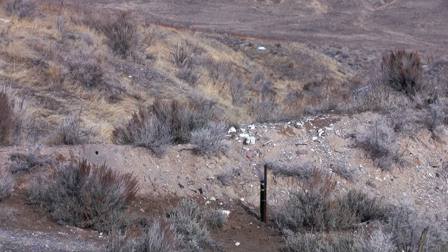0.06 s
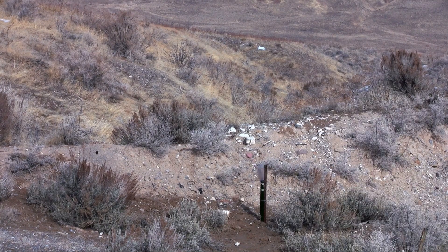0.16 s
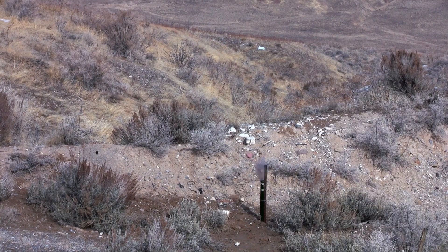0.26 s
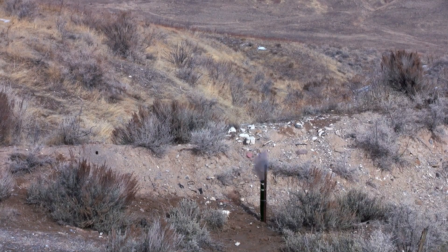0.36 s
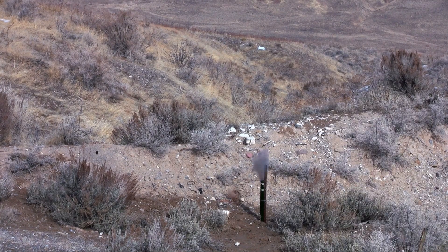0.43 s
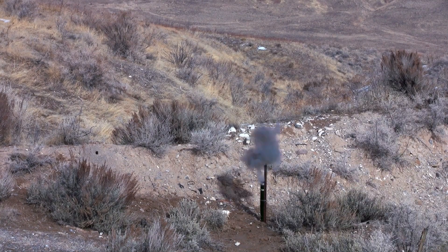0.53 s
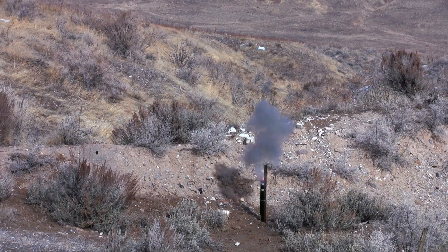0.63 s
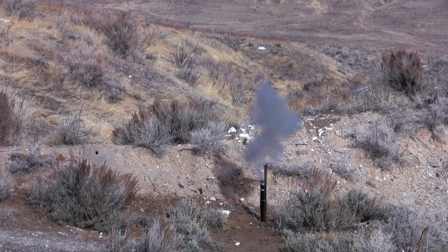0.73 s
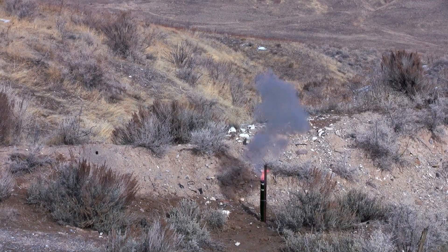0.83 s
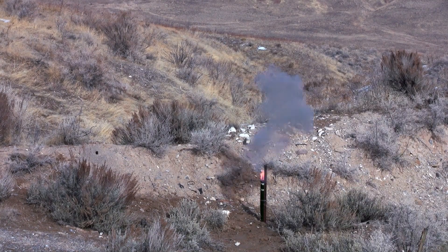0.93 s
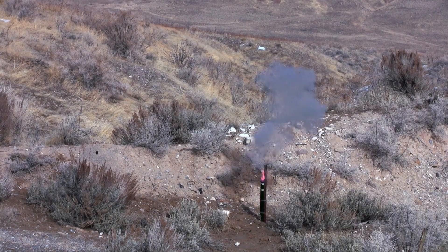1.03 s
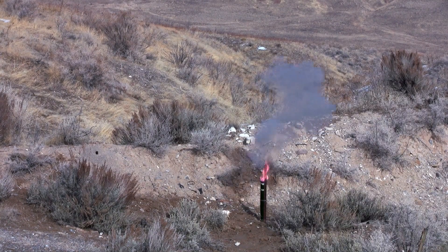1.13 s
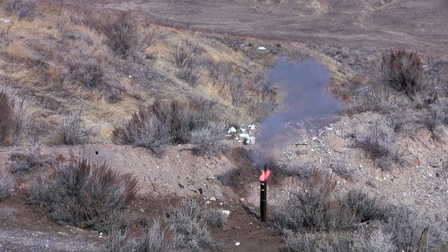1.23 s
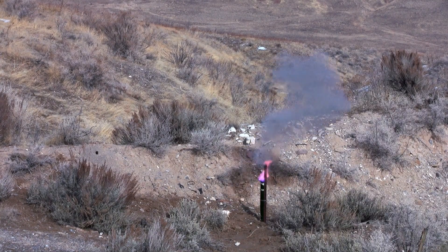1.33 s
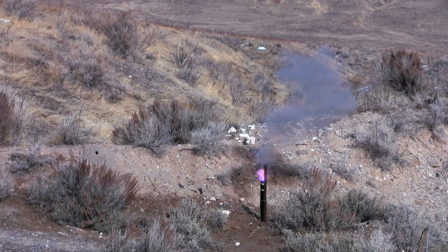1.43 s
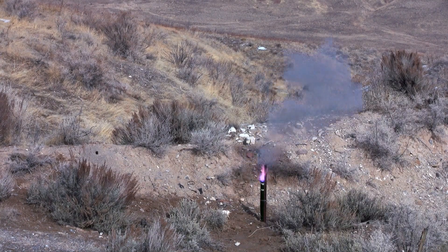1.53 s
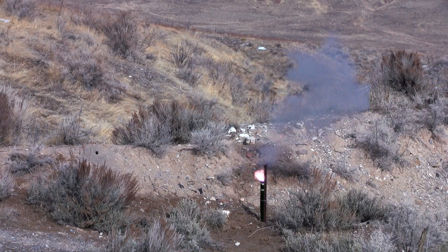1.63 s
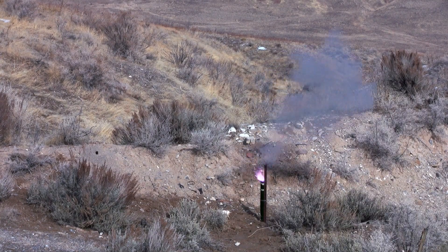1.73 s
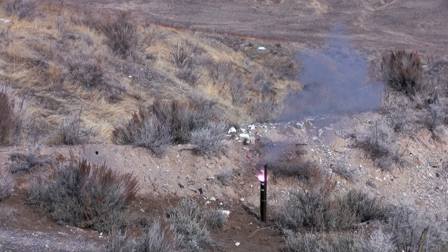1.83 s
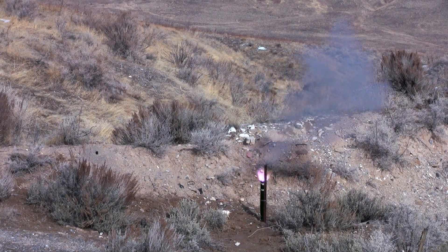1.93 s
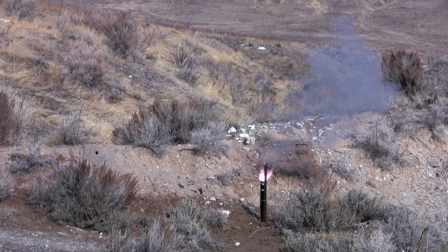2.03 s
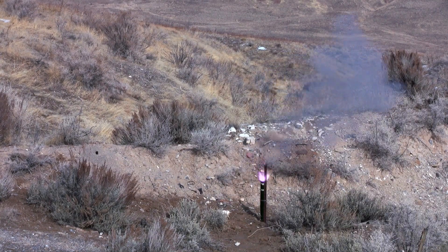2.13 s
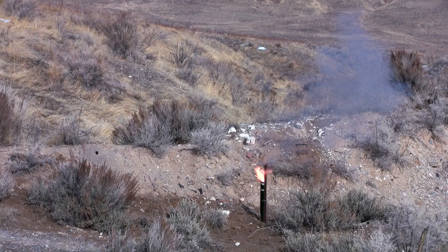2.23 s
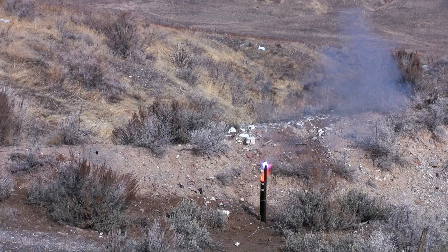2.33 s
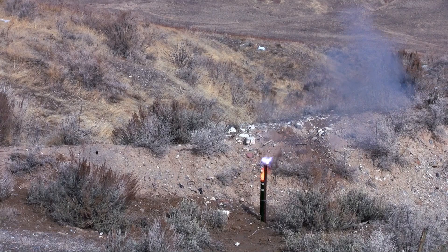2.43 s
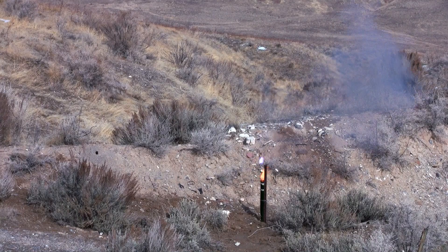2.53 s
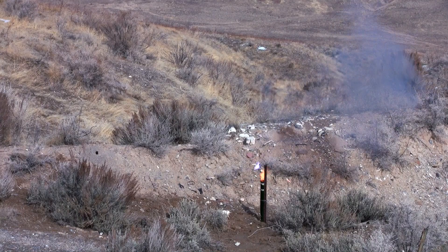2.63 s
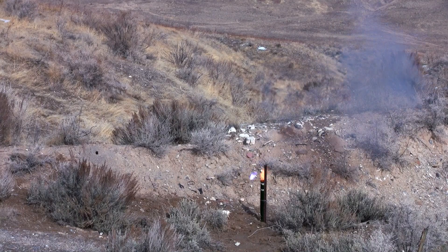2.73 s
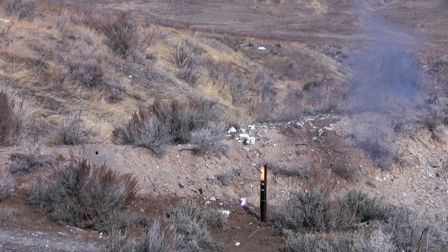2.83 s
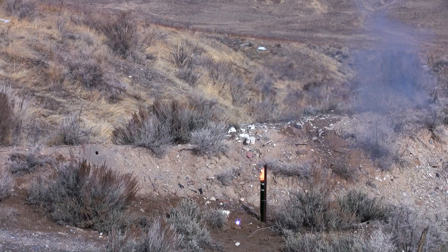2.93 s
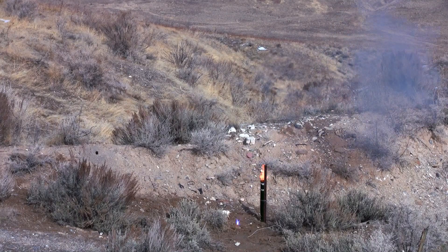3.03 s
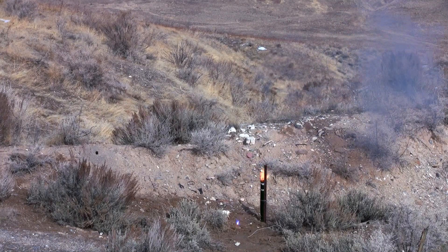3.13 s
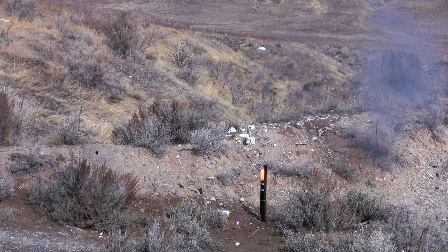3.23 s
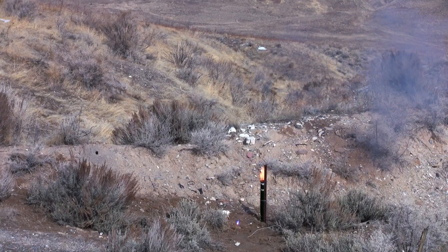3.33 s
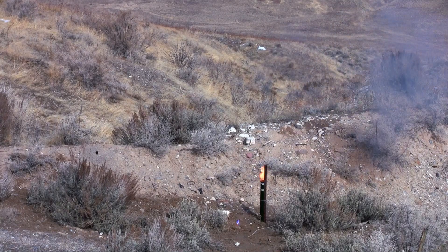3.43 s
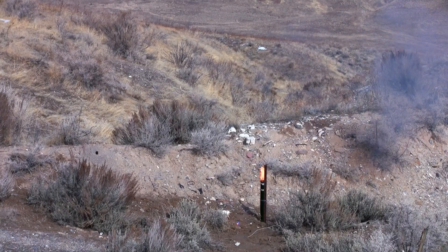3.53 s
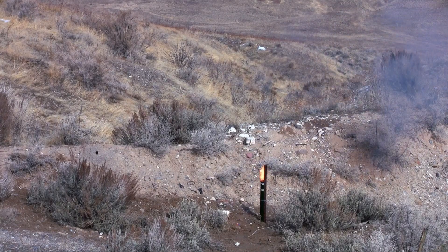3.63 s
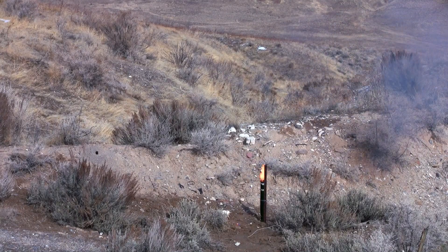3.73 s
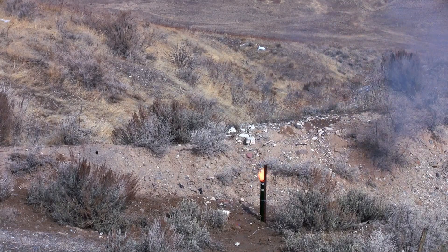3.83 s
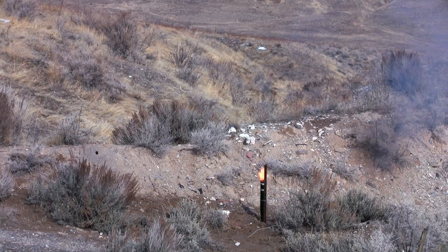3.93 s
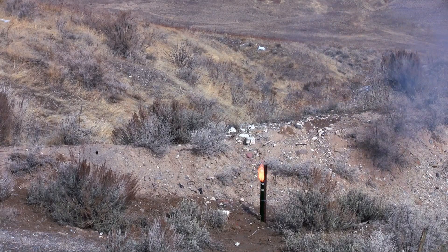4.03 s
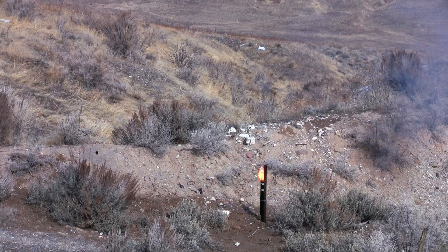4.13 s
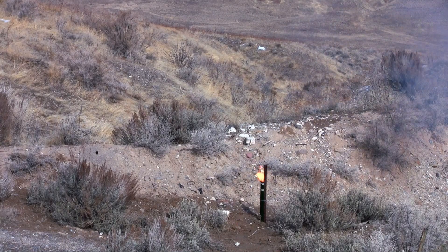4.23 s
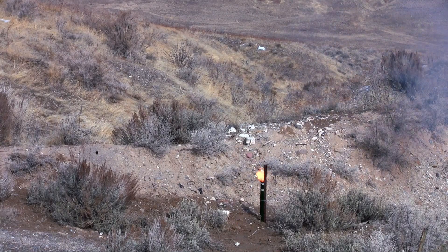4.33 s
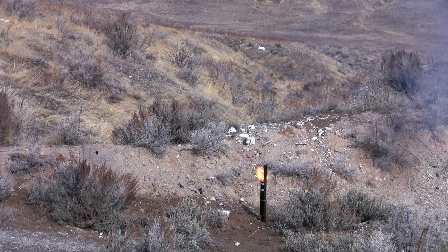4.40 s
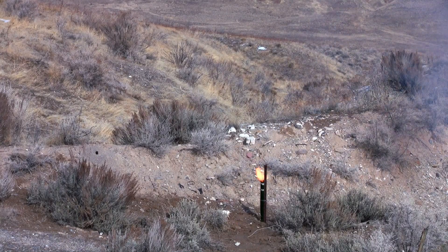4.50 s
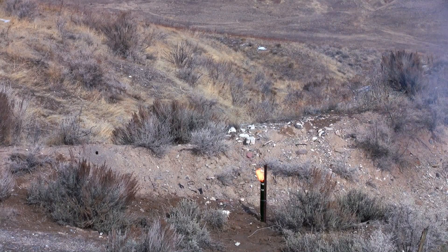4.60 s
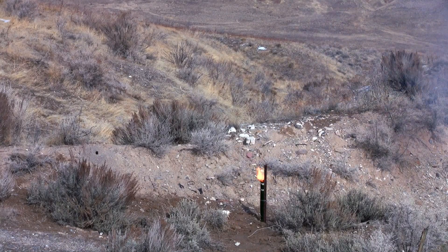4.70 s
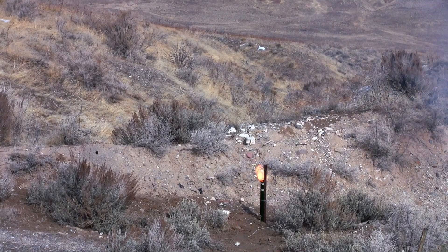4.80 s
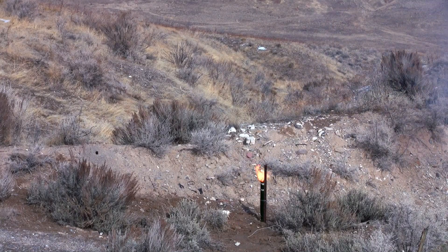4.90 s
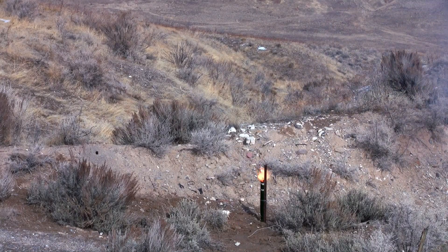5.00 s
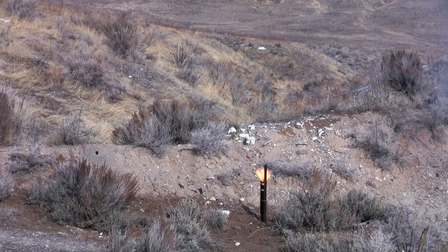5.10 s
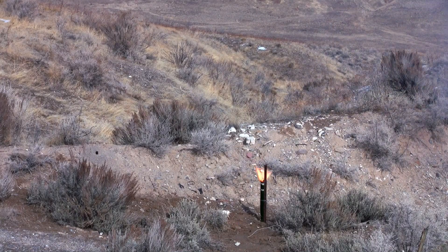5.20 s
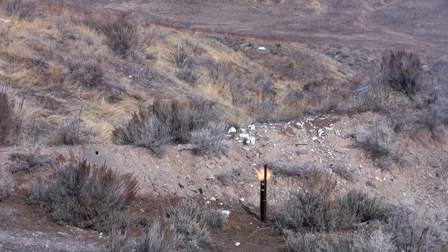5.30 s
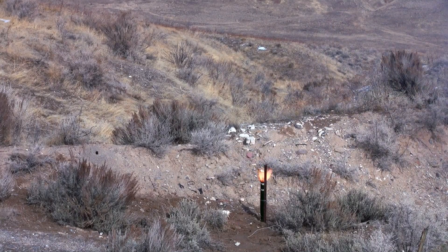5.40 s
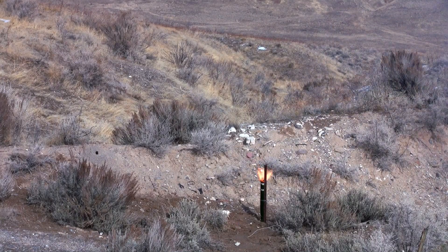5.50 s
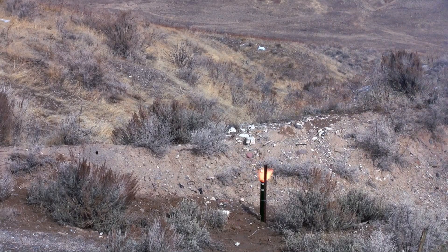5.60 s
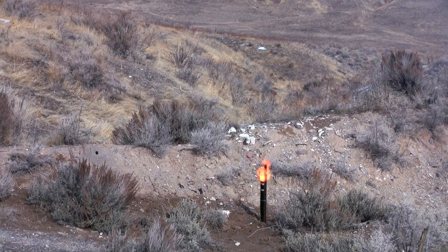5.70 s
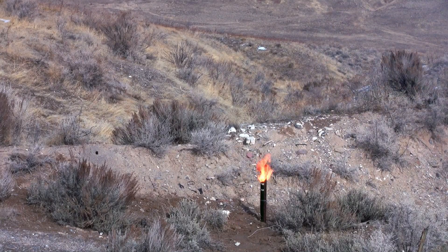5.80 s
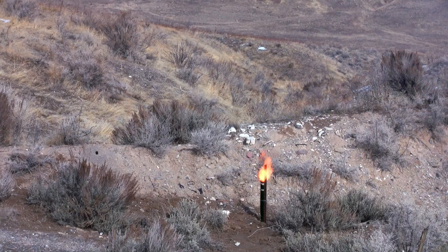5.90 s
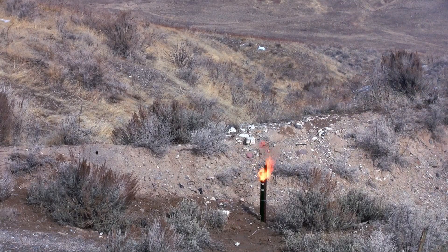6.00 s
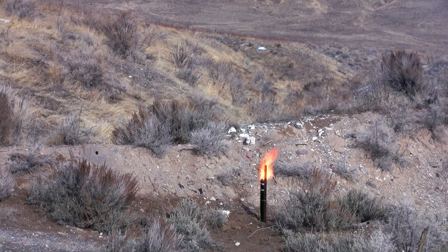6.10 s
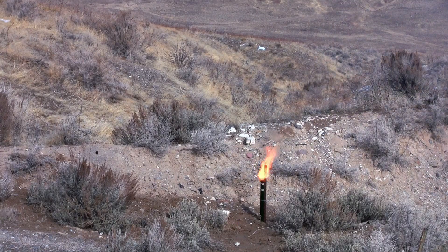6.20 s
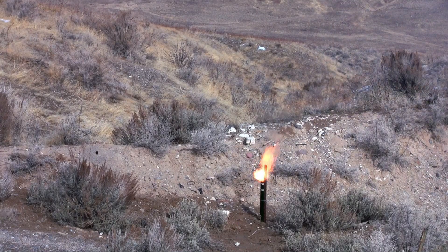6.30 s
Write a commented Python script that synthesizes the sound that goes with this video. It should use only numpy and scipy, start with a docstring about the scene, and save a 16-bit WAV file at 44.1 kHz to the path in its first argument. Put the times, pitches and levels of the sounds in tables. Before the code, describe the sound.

Rising gas hiss snaps into a loud crack echoing off a hillside, followed by ragged flame bursts, faint sputter, and a long growing roar turning to hiss.

```python
"""A homemade rocket motor chuffs on a stand on a hillside, straight ahead of two microphones.
Noise shaped as gas hisses from the nozzle in swelling surges, roars as open flame, and twice breaks off
with a crack made of millisecond spurts. Low noise rumbles in the plume; the motor also smoulders, spits and thuds.
The ground combs the hiss, brush nearby, a bank behind and a far slope throw the sound back as decaying
scatter, and at first puffs of breeze brush the microphones over quiet open-country air."""
import sys
import numpy as np
from scipy import signal
from scipy.fft import rfft, irfft, next_fast_len
from scipy.io import wavfile
from scipy.ndimage import uniform_filter1d

SR = 44100
rng = np.random.default_rng(int(sys.argv[2]) if len(sys.argv) > 2 else 0)


def wrap_up_sound(samples):
    """Save the sound to the file named by the first command line argument, as 16-bit audio."""
    columns = np.atleast_2d(samples).T
    # keep every value between -1 and 1, then stretch to whole-number steps
    tamed = np.clip(columns, -1, 1)
    steps = np.round(tamed * 32767).astype(np.int16)
    wavfile.write(sys.argv[1], SR, steps)


N = 280146
TIME = np.arange(N) / SR


def gain_of(db):
    """Decibels to amplitude."""
    return 10 ** (np.asarray(db) / 20)


def evened(x):
    """Scales to rms 1."""
    return x / np.sqrt(np.mean(x ** 2) + 1e-20)


def read(points, hz):
    """Reads a spectrum on a log-frequency axis."""
    f, value = np.transpose(points)
    return np.interp(np.log(hz + 1), np.log(f + 1), value)


def coloured(x, spectrum):
    """Filters a signal by a spectrum."""
    size = next_fast_len(len(x) + 2048)
    gain = gain_of(read(spectrum, np.fft.rfftfreq(size, 1 / SR)))
    return irfft(rfft(x, size) * gain, size)[:len(x)]


def wander(t, top_hz):
    """Slow random drift of rms 1 with movements up to about top_hz."""
    knots = rng.standard_normal(4000)
    # 1.22 restores the rms that straight lines between the knots lose
    return 1.22 * np.interp(t * 2 * top_hz, np.arange(len(knots)), knots)


def gate(t, start, end, fade):
    """Opens around start and shuts around end, keeping the power even where two spells meet."""
    return np.sqrt(np.clip(np.minimum(t - start, end - t) / fade + .5, 0, 1))


# Colour of the open air: (frequency [Hz], relative level [dB per Hz])
AIR_COLOUR = [(15, -50.5), (25, -20.5), (59, -5), (227, -5.5), (349, -1), (445, -6), (523, -4),
              (997, -10.5), (1620, -10.5), (3720, -22), (5140, -30), (8130, -35), (15500, -44)]
# What differs between the microphones in the air, side minus mid: (frequency [Hz], level [dB])
AIR_SPREAD = [(40, -7), (200, -5), (700, 1), (3000, -7.5), (8000, 0.5), (14000, -1.5)]


def air():
    """Quiet open country: steady noise, partly different at each microphone."""
    both, apart = (evened(coloured(rng.standard_normal(N), AIR_COLOUR)) for _ in range(2))
    apart = coloured(apart, AIR_SPREAD)
    level_db = -61
    return gain_of(level_db) * (both + np.array([apart, -apart]))


def billow_power(s, db, length):
    """A billow of gas or air swells quickly and rolls away over its own length."""
    power, rise_s = np.zeros(N), .012
    near = slice(*np.searchsorted(TIME, [s - .1, s + 4 * length]))
    age = TIME[near] - s
    power[near] = gain_of(db) ** 2 * np.exp(-(age / np.where(age < 0, rise_s, length)) ** 2)
    return power


# Colour of wind on the microphones: (frequency [Hz], relative level [dB per Hz])
WIND_COLOUR = [(25, -29), (45, -9), (70, 0.5), (140, 4), (300, -2.5), (500, -8), (800, -15), (1600, -34.5),
               (6000, -79.5)]
# Puffs of wind that buffet the microphones: (time [s], peak level [dB], length [s])
WIND_PUFFS = [(.03, -49.5, .2), (.24, -48, .08), (.37, -49, .07), (.455, -38.5, .045), (.57, -54, .04),
              (.79, -51.5, 0.11), (1.03, -59, .03)]


def wind():
    """Puffs of breeze buffet each microphone with its own low noise, swelling together."""
    ports = np.array([evened(coloured(rng.standard_normal(N), WIND_COLOUR)) for _ in range(2)])
    return np.sqrt(sum(billow_power(*puff) for puff in WIND_PUFFS)) * ports


CRACK_BOUNCE_MS, CRACK_BOUNCE = .545, .36  # delay [ms] and share of the ground bounce


def ground(hz, delay_ms, share):
    """Gain of the direct sound plus its bounce off the ground, a comb in frequency."""
    return abs(1 + share * np.exp(-2j * np.pi * hz * delay_ms / 1e3)) / np.sqrt(1 + share ** 2)


# Brush nearby, bank behind and far slope, before colouring:
# (delay [s], energy per second [dB], rise [dB/s], fall [dB/s])
ECHOES = [(.008, -8.5, 299.5, 384.5), (.1, -25.5, 100.5, 99.5), (.35, -21.5, 302, 280)]


def hillside(x, absorb_db, from_s):
    """Scatter arriving after from_s; air takes absorb_db per kHz and second of travel."""
    t = np.arange(SR * 6 // 10) / SR
    power = sum(gain_of(db - np.maximum(rise * (s - t), fall * (t - s))) ** 2
                for s, db, rise, fall in ECHOES)
    taps = rng.standard_normal(len(t)) * np.sqrt(power / SR) * (t >= from_s)
    hz, delay, z = signal.stft(taps, SR, nperseg=256)
    # sound that leaves sideways to the slope lacks the ground comb
    z = z / ground(hz[:, None], CRACK_BOUNCE_MS, CRACK_BOUNCE)
    absorbed = gain_of(-absorb_db * delay * hz[:, None] / 1e3)
    tail = signal.istft(z * absorbed, SR, nperseg=256)[1]
    tail = coloured(tail, [(150, -1.0), (1000, -5.5), (2500, 4.0), (8000, 9), (14000, 6.5)])
    return signal.fftconvolve(x, tail)[:N]


# How the two microphones differ, side minus mid: (frequency [Hz], level [dB])
PORT_PHASE = [(1000, -40.5), (3000, -62.5), (6000, -43.5), (7500, -24.5), (9000, -12.5), (14000, -16)]  # quarter-cycle phase shift
LEAN_RIGHT = [(5000, -56.5), (8500, -19), (12000, -46.5)]  # level lean
DIFFUSE = [(30, -22), (80, -28), (160, -30.5), (600, -22.5), (1300, -37), (3000, -55), (14000, -24)]  # scatter


def microphones(mid):
    """The motor is straight ahead: the ports differ in the top treble and in what the ground scatters."""
    scatter = rng.standard_normal(700) * np.hanning(700)
    scattered = signal.fftconvolve(mid, scatter / np.linalg.norm(scatter))[:N]
    quarter_cycle = signal.hilbert(mid, next_fast_len(N))[:N].imag
    side = coloured(quarter_cycle, PORT_PHASE) - coloured(mid, LEAN_RIGHT)
    side = side + coloured(scattered, DIFFUSE)
    return np.array([mid + side, mid - side])


def turbulence(t, flutter_db, pop_db, pops_per_s):
    """Noise that flutters as the propellant burns unevenly, with sharp pops in it."""
    pops = (rng.random(len(t)) < pops_per_s / SR) * np.minimum(rng.exponential(1, len(t)), 3)
    flutter = gain_of(flutter_db * (wander(t, 30) + wander(t, 150)))
    return evened(flutter * (rng.standard_normal(len(t)) + gain_of(pop_db) * pops))


# Colour of the smouldering: (frequency [Hz], relative level [dB per Hz])
SMOULDER_COLOUR = [(30, -33), (90, -2), (220, 6), (500, 1.5), (900, -5), (2000, -54.5), (5000, -31),
                   (15000, -41.5)]


def smoulder():
    """A soft, dull flutter of the small flame left in the nozzle, slowly growing."""
    start, end = 2, 4.2  # s
    first_db, growth_db_per_s = -63, 2.5
    gas = turbulence(TIME, flutter_db=2, pop_db=-6, pops_per_s=27)
    gas = evened(coloured(gas, SMOULDER_COLOUR))
    return gas * gain_of(first_db + growth_db_per_s * (TIME - start)) * gate(TIME, start, end, 0.065)


# Spits of the smouldering grain: (time [s], peak level [dB], relative treble [dB], decay time [s])
SPITS = [(2.671, -52, -8.5, .005), (2.709, -51, -22, .006), (2.766, -54, -17, .004),
         (2.793, -52.5, -16, 0.0048), (2.98, -54.5, -16, 0.0038), (2.987, -50.5, -18, 0.0038),
         (3.04, -52.5, -13, 0.0033), (3.0777, -51, -32, 0.0043)]


def spits():
    """Tiny pops of the smouldering propellant: noise bursts that die away in milliseconds."""
    out, t = np.zeros(N), np.arange(2048) / SR
    for s, db, treble_db, decay in SPITS:
        colour = [(30, -30.5), (200, -5), (1000, 11), (3000, -2.0),
                  (7000, treble_db), (10500, treble_db - 3), (15000, treble_db - 27.5)]
        pop = evened(coloured(rng.standard_normal(len(t)), colour)) * np.exp(-t / decay)
        out[round(s * SR):][:len(t)] += gain_of(db) * pop
    return out


# Low thuds, as the flame blows out or catches:
# (start time [s], peak level [dB], pitch [Hz], ring time [s])
THUDS = [(2.350, -31.5, 221, 0.0024), (6.181, -36, 224, 0.0077)]


def thuds():
    """Each is a soft push of air: a low sine that swells and dies within a few cycles."""
    out = np.zeros(N)
    for s, db, hz, ring in THUDS:
        age = np.maximum(TIME - s, 0)
        swell = age / ring * np.exp(1 - age / ring)
        out += gain_of(db) * swell * np.sin(2 * np.pi * hz * age)
    return out


# Spurts of gas that make the cracks: (time [s], peak level [dB], rise time [s], fall time [s])
SPURTS = [(0.594, -23, .004, 0.0019), (0.621, -16, 0.0061, 0.0026), (0.6255, -5.5, .0025, 0.0031),
          (.631, -10, .0012, 0.0017), (0.639, -0.5, .0022, 0.0026), (0.6444, -11, .0015, .003),
          (2.348, -37, .006, 0.0054), (2.36, -48.5, 0.0033, 0.027)]
# Colour of the cracks: (frequency [Hz], relative level [dB per Hz])
CRACK_COLOUR = [(25, -64.5), (100, -29), (280, -15), (520, -20), (1150, 1), (2000, -4), (3300, -6.0),
                (5500, -16.5), (7300, -16), (9300, -17.5), (11000, -30.5), (15000, -44.5)]


def cracks():
    """Pressure runs away and vents in spurts of a few milliseconds, too small to push deep bass."""
    power = np.zeros(N)
    for s, db, rise, fall in SPURTS:
        distance = np.maximum((s - TIME) / rise, (TIME - s) / fall).clip(0, 20)
        power += gain_of(db) ** 2 * np.exp(-2 * distance)
    size = next_fast_len(N)
    hz = np.fft.rfftfreq(size, 1 / SR)
    colour = gain_of(read(CRACK_COLOUR, hz)) * ground(hz, CRACK_BOUNCE_MS, CRACK_BOUNCE)
    gas = irfft(rfft(rng.standard_normal(size)) * colour, size)[:N]
    no_bass = signal.butter(2, 110, "high", fs=SR, output="sos")
    return signal.sosfilt(no_bass, np.sqrt(power) * evened(gas))


def pressure(surge, t):
    """How far a surge has built up, reaching 1 at its end; a higher ease levels off early."""
    start, end, _, _, ease = surge[:5]
    return 1 - np.clip((end - t) / (end - start), 0, 1) ** ease


def plume_power(surge, follows):
    """The plume rumbles louder as the pressure builds, by follows dB per dB of surge."""
    start, end, first_db, last_db, *_, rumble_db = surge
    below_db = (last_db - first_db) * (1 - pressure(surge, TIME))
    return (gain_of(rumble_db - follows * below_db) * gate(TIME, start, end, fade=0.014)) ** 2


# Colour of the rumble: (frequency [Hz], relative level [dB per Hz])
RUMBLE_COLOUR = [(25, -47), (45, -37), (70, -17.5), (120, -5), (240, 2.5), (330, -3), (480, -15.5),
                 (1200, -56), (6000, -87)]
# Billows of the plume, each a low whoomph: (time [s], peak level [dB], length [s])
BILLOWS = [(1.52, -51.5, 0.15), (1.724, -39, 0.023), (1.84, -38.5, 0.11), (2.143, -39, 0.024),
           (2.276, -36, 0.037), (2.353, -32.5, 0.011), (4.348, -52, 0.057), (4.727, -41, 0.036),
           (4.95, -44, 0.018), (5.086, -34.5, 0.045), (5.345, -37, 0.025), (5.567, -45, 0.11),
           (5.89, -41.5, 0.034), (6.027, -44, .03), (6.196, -37, 0.054), (6.28, -37.5, 0.06)]


def rumble():
    """Large eddies of the plume as low noise, with a billow now and then."""
    power = sum(plume_power(surge, follows=.15) for surge in JETS)
    power += sum(plume_power(surge, follows=1) for surge in FLAMES)
    power += sum(billow_power(*billow) for billow in BILLOWS)
    return np.sqrt(power) * evened(coloured(rng.standard_normal(N), RUMBLE_COLOUR))


# Flares, as a piece of propellant burns faster:
# (time [s], half length [s], level change [dB], treble change [dB])
FLARES = [(.33, 0.046, 1, 2), (0.589, 0.0067, 3, 5), (1.49, .022, 3.5, 5.5), (1.59, 0.089, -1, 9),
          (1.73, 0.022, 7, -4.5), (1.932, 0.047, 5, -1.5), (2.152, 0.016, 3, 0), (2.285, 0.041, 3, -6.5),
          (2.348, 0.015, 8.5, -1), (4.438, .03, 1, -1), (4.7, 0.13, 1.5, -0.5), (5.094, 0.043, 3, 1.5),
          (5.212, 0.072, 2, 2.5), (5.52, 0.22, 1, 0), (5.777, 0.011, 1.5, 3), (6.008, 0.035, 3.5, -3.5),
          (6.13, 0.027, 3.5, -2), (6.326, 0.066, 8, -1.5)]


def effort(surge, t):
    """Level and treble (dB) of a surge: both move with the pressure and shift in each flare."""
    _, _, first_db, last_db, _, first_treble_db, last_treble_db, _ = surge
    built = pressure(surge, t)
    level_db = first_db + (last_db - first_db) * built
    treble_db = first_treble_db + (last_treble_db - first_treble_db) * built
    for s, length, boost_db, bright_db in FLARES:
        flare = np.exp(-((t - s) / length) ** 2)
        level_db = level_db + boost_db * flare
        treble_db = treble_db + bright_db * flare
    return level_db, treble_db


# Gusts in which the gas nearly whistles, before level and treble are balanced:
# (time [s], half length [s], pitch [Hz], boost [dB])
GUSTS = [(.318, .087, 4215, 3), (1.275, 0.19, 1610, 6), (1.36, 0.048, 2350, 6), (1.475, 0.041, 3400, 1.5),
         (1.666, 0.029, 5100, 10), (1.73, 0.045, 2040, 8.5), (1.888, 0.073, 3300, 5.5),
         (2.03, 0.022, 4830, 9), (2.14, 0.049, 4950, 5.5), (5.861, 0.069, 5340, 6.5),
         (6.007, 0.036, 5100, 9.5), (6.13, 0.019, 3050, 8), (6.15, 0.025, 9200, 12),
         (6.292, 0.048, 3480, 10)]


def gust_db(hz, t, octaves):
    """Each gust lifts a broad peak of the gas noise for a moment."""
    s, length, pitch, db = np.transpose(GUSTS)
    peak = np.exp(-np.minimum((np.log2((hz[:, None] + 1) / pitch) / octaves) ** 2, 20))
    moment = np.exp(-np.minimum(((t[:, None] - s) / length) ** 2, 20))
    return (db * peak) @ moment.T


def rush(surge, spectrum, bounce, delay_ms, flutter_db, pop_db, patchy_db, knee_hz, fade):
    """Turbulent gas: it brightens as the pressure builds, and eddies shift its colour in patches."""
    start, end = surge[:2]
    live = (TIME > start - .04) & (TIME < end + .04)
    t = TIME[live]
    gas = turbulence(t, flutter_db, pop_db, pops_per_s=70)
    hz, frames, z = signal.stft(gas, SR, nperseg=512, noverlap=384)
    frames = frames + t[0]
    level_db, treble_db = effort(surge, frames)
    body, treble = (hz > 800) & (hz < 4500), (hz > 6000) & (hz < 12000)
    colour = gain_of(read(spectrum, hz)[:, None] + gust_db(hz, frames, octaves=0.37))
    # the plume sways, so the delay of the ground bounce drifts
    swaying_ms = delay_ms * (1 + .008 * wander(frames, 5))
    colour = colour * ground(hz[:, None], swaying_ms, bounce)
    # a shelf above the knee sets the treble against the body of the sound
    own_db = 10 * np.log10((colour[treble] ** 2).sum(0) / (colour[body] ** 2).sum(0))
    shelf_db = read([(knee_hz, 0), (7000, 1)], hz)[:, None] * (treble_db - own_db)
    eddies = uniform_filter1d(rng.standard_normal(z.shape), size=8, axis=0)
    eddies = evened(uniform_filter1d(eddies, size=16, axis=1))
    colour = colour * gain_of(shelf_db + patchy_db * eddies)
    # the surge level is that of the body band
    colour = colour / np.sqrt((colour[body] ** 2).sum(0) / len(hz))
    sound = signal.istft(z * colour, SR, nperseg=512, noverlap=384)[1][:len(t)]
    # so small a nozzle radiates no deep bass
    sound = coloured(sound, [(30, -29.0), (150, 0.5), (10500, -1.5), (15000, -7)])
    out = np.zeros(N)
    out[live] = sound * gain_of(np.interp(t, frames, level_db)) * gate(t, start, end, fade)
    return out


# Surges of open flame; treble is set against the body, ease 1 = a steady climb:
# (start [s], end [s], first level [dB], last level [dB], ease,
#  first treble [dB], last treble [dB], last rumble [dB])
FLAMES = [(1.699, 2.351, -44, -37, 12, -21.5, -18, -43.5), (3.2, 5.755, -69, -32, 0.99, -37, -11, -32)]
# Colour of each roar before its treble is set: (frequency [Hz], relative level [dB per Hz])
SHORT_ROAR = [(116, -21), (350, -5.5), (550, -6), (1000, -3), (2000, -7), (3500, -10.5), (4500, -14),
              (5500, -19.5), (7500, -18.5), (9500, -23.5), (11500, -37.5), (14500, -49)]
LONG_ROAR = [(116, -13.5), (340, -3.5), (500, -6), (700, -1.5), (1400, -4), (2400, -8), (2700, -8.5),
             (3000, -15.5), (3450, -10.5), (3850, -11.5), (4200, -16), (4700, -18.5), (7200, -23.5),
             (9700, -30.5), (11500, -41), (14800, -58)]


def flame():
    """The open flame is wider than the jet, so the ground combs it less; it is fuller and more ragged."""
    short, long = FLAMES
    out = rush(short, SHORT_ROAR, bounce=.15, delay_ms=.55, flutter_db=1.25, pop_db=11,
               patchy_db=2.3, knee_hz=2500, fade=.02)
    out += rush(long, LONG_ROAR, bounce=.22, delay_ms=.515, flutter_db=.85, pop_db=8,
                patchy_db=1.2, knee_hz=1500, fade=.018)
    return out


# Surges of the hissing jet, with pressure building until each breaks off:
# (start [s], end [s], first level [dB], last level [dB], ease,
#  first treble [dB], last treble [dB], last rumble [dB])
JETS = [(0.0, .601, -62, -24.5, 1.357, -37, -15.5, -55.5), (1.163, 1.693, -62, -38, 1.3, -50, -18.5, -65),
        (5.754, 6.352, -36, -29.5, 1.63, -16, -6, -45.5)]
# Colour of each hiss before its treble is set: (frequency [Hz], relative level [dB per Hz])
FIRST_HISS = [(166, -40.5), (600, -19), (800, -11.5), (1050, -0.5), (1500, -1.5), (2100, -3), (3300, -5),
              (4200, -11), (5500, -21.5), (7500, -16.5), (9500, -23.5), (11000, -34), (14800, -51)]
SECOND_HISS = [(166, -30), (500, -13), (900, 3), (1600, -2), (3200, 3.5), (5000, -7), (7500, -14.5),
               (9500, -28), (11000, -37), (14000, -50.0)]
LAST_HISS = [(166, -34), (500, -11.5), (950, 0.5), (1600, 2.5), (2300, 3), (3300, -2), (4200, -4.5),
             (5500, -7), (7500, -8), (9500, -9.5), (11500, -21), (14800, -35)]


def jet():
    """The narrow jet is a compact source, so the ground combs it deeply."""
    first, second, last = JETS
    out = rush(first, FIRST_HISS, bounce=.47, delay_ms=.55, flutter_db=.6, pop_db=0,
               patchy_db=.6, knee_hz=2000, fade=.015)
    out += rush(second, SECOND_HISS, bounce=.5, delay_ms=.572, flutter_db=.8, pop_db=3,
                patchy_db=.9, knee_hz=2000, fade=.025)
    out += rush(last, LAST_HISS, bounce=0.26, delay_ms=0.546, flutter_db=0.87, pop_db=10,
                patchy_db=0.5, knee_hz=4660, fade=0.0026)
    return out


def scene():
    """The motor, its echoes from ahead and from the sides, the wind and the open air."""
    motor = jet() + flame() + rumble() + smoulder() + cracks() + thuds() + spits()
    ahead = hillside(motor, absorb_db=8.5, from_s=0)
    echo_width_db = -12  # side minus mid of the later echoes
    aside = gain_of(echo_width_db) * hillside(motor, absorb_db=8.5, from_s=.05)
    return microphones(motor + ahead) + np.array([aside, -aside]) + wind() + air()


def record(dry):
    """The level dips briefly once and loud peaks are rounded off near full scale; then the band limits."""
    dip = gain_of(np.interp(TIME, [4.51, 4.513, 4.517, 4.526], [0, -18, -18, 0]))
    ceiling, edge_hz = .93, 15500
    rounded = ceiling * np.tanh(dip * dry / ceiling)
    rounded = signal.sosfilt(signal.butter(2, 35, "high", fs=SR, output="sos"), rounded)
    lowpass = signal.firwin(301, edge_hz, window=("kaiser", 9), fs=SR)
    return signal.oaconvolve(rounded, lowpass[None], "same")


dry = scene()
out = record(dry)
wrap_up_sound(out)
```